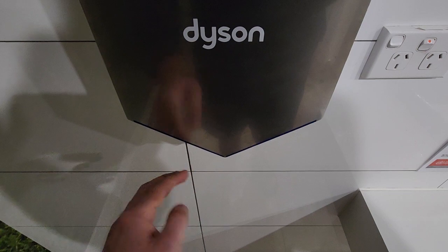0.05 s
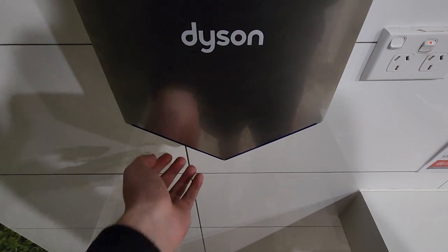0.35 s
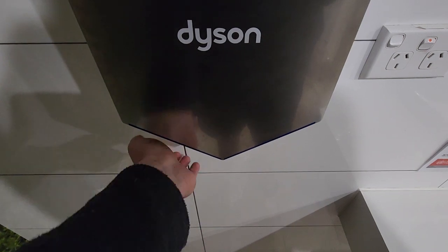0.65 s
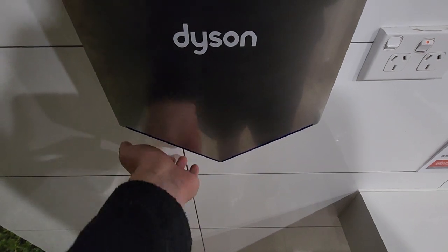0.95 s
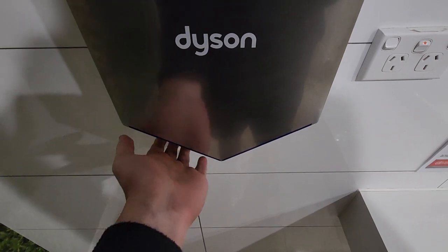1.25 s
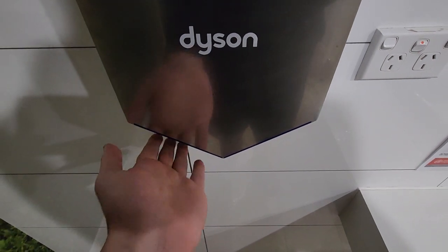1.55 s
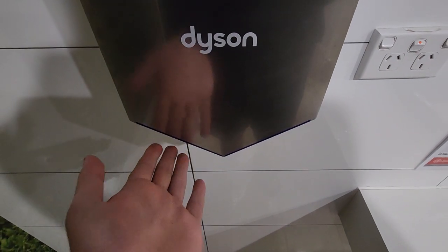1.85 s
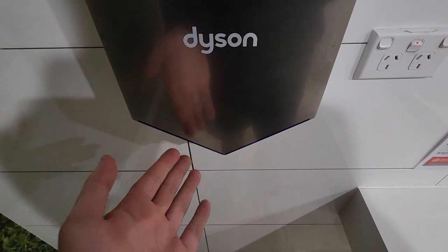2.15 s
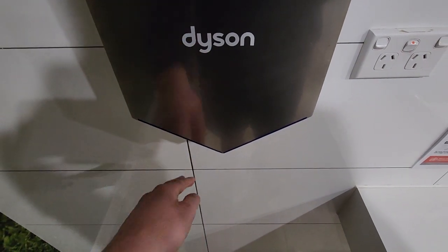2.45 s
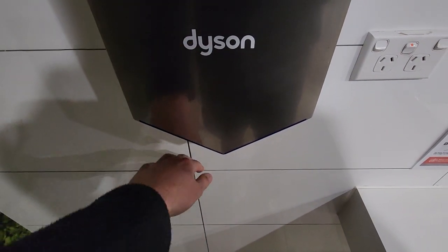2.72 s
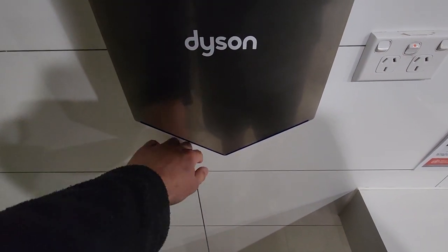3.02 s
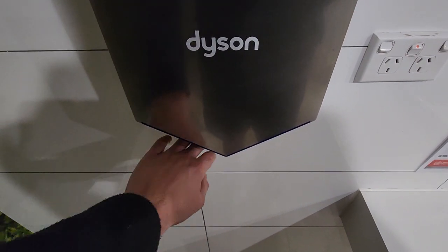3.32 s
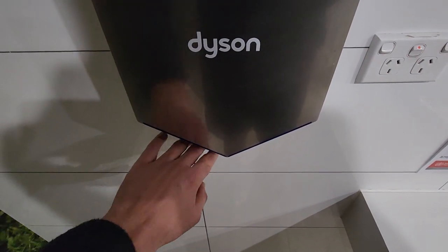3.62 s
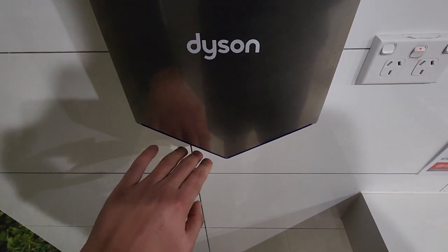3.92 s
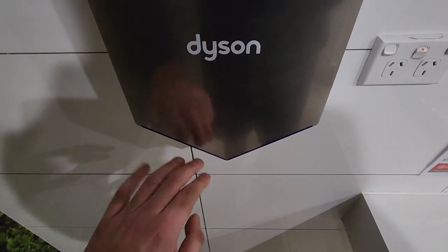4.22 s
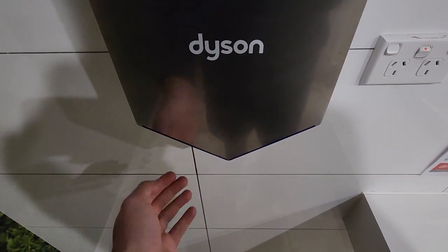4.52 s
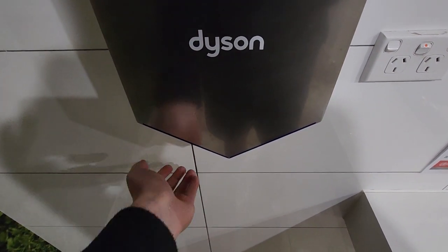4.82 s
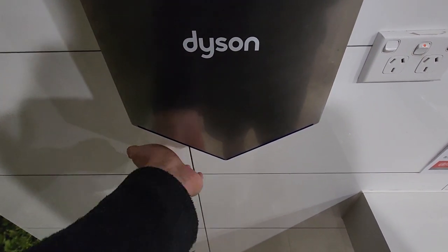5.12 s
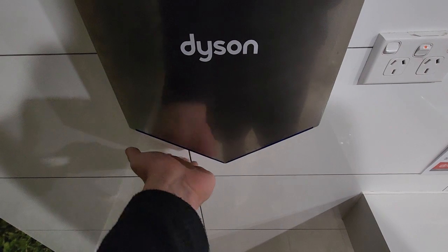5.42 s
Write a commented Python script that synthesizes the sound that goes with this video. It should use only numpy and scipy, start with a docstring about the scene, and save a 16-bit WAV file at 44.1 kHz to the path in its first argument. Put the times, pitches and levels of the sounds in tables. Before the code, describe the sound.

A hand dryer runs without a break in a small tiled washroom, close to the microphone. Thin air jets hiss over a rumbling casing, a low drone, an electrical hum and a thin motor whine. A hand moves through the air about four times; each pass starts hollow in the cupped palm, roars on the flat hand, then rasps over the fingers. The dryer is still blowing at the end.

```python
"""A hand dryer on the wall of a small tiled washroom blows for about 5.6 seconds, close to a phone.
From the start, thin air jets hiss over a rumbling casing, a low drone, a mains hum and a motor whine.
A hand is just finishing a stroke through the jets; new strokes begin at 0.1, 1.1, 2.5 and 4.5 s.
In each, the air rings hollow in the cupped palm, roars on the flat hand, then rasps over the fingers.
The roar is strongest near 1.7 and 3.8 s, and the dryer is still running at the end."""
import sys
import numpy as np
from scipy.fft import rfft, irfft
from scipy.io import wavfile
from scipy.ndimage import uniform_filter1d

SR = 44100
rng = np.random.default_rng(int(sys.argv[2]) if len(sys.argv) > 2 else 0)


def dump_mix(stems):
    """Bounce the given channels to the path in sys.argv[1] as a 16-bit WAV at rate SR."""
    frames = np.atleast_2d(stems).T  # one column per channel
    limited = np.clip(frames, -1, 1)  # hard clip at full scale
    pcm = np.round(limited * 32767).astype(np.int16)
    wavfile.write(sys.argv[1], SR, pcm)


N = 245637
T = np.arange(N) / SR  # the time of each sample
HZ = np.maximum(np.arange(N // 2 + 1) * SR / N, 1)  # the pitch of each slice of the spectrum

# colour (strength at each pitch) of the free air jets: pitch_hz, level_db_per_hz
JET_COLOUR = [(200, -75), (450, -69), (1000, -68), (2000, -69.5), (2800, -68.5), (3800, -65.5),
              (4600, -64.5), (6000, -64.5), (7700, -62.5), (11600, -56.5), (15500, -54)]
# air rumbling in the casing: pitch_hz, level_db_per_hz
RUMBLE_COLOUR = [(15, -67), (42, -60.5), (58, -61), (90, -51), (125, -52), (215, -61), (310, -54),
                 (360, -60), (420, -73), (700, -102)]
# narrow resonances on top of that rumble: pitch_hz, width_hz, peak_db_per_hz
CASING_RINGS = [(176.4, 11, -45.5), (203.4, 8.5, -47.5), (236.6, 13, -52), (320.4, 3.6, -53.5),
                (357, 6.9, -60.5), (531.7, 6.2, -58.5)]
# low resonances of casing and room that make the drone: pitch_hz, width_hz, relative_db
DRONE_RINGS = [(140.5, 5.5, -1.5), (156, 4.5, 0), (173.5, 4, -3.5)]
# the drone swells now and then: centre_s, length_s, rise_db
DRONE_SWELLS = [(0.55, 0.29, 4.5), (1.85, 0.45, 2), (2.8, 0.55, 3), (4.43, 0.23, 6)]
# tones in the mains hum: multiple_of_hum_pitch, level_db
HUM_TONES = [(1, -13), (2, -32)]
# the motor shaft settles to its running speed: time_s, pitch_hz
SHAFT_SPEED = [(0, 1488), (.55, 1489), (.9, 1479), (1.3, 1477), (2.4, 1481), (3.2, 1478.5), (5, 1480)]
# the whine at the phone's two microphones, before its boost: time_s, left_db, right_db
WHINE_LEVEL = [(0, -50, -40), (1.3, -32, -37), (1.95, -36.5, -34.5), (2.45, -36, -45), (2.8, -34, -36.5),
               (4.1, -36, -39), (4.8, -34.5, -35.5), (5.5, -38, -35.5)]
# how far the whine's wave is ahead at the left microphone: time_s, lead_radians
WHINE_LEAD = [(.95, 4.4), (1.25, 3.45), (1.85, 3.25), (2.7, 4.6), (2.95, 3.4), (3.25, 3.3), (3.55, 3.85),
              (4.45, 3.7), (5, 4.4)]
# strokes of the hand; the palm fades from its level, the rasp builds up to its own:
# start_s, length_s, palm_db, rasp_db, rasp_build_db
HAND_STROKES = [(-0.5, 0.54, -25.5, -27, 5), (0.1, 0.94, -33.5, -25, 14.5), (1.105, 0.98, -40, -22, 6),
                (2.51, 1.72, -34, -22.5, 15.5), (4.5, 0.99, -33.5, -25, 14)]
# the hand lies flat under the jets and roars: centre_s, length_s, level_db
FLAT_HAND = [(0.5, 0.65, -36.5), (1.69, 0.55, -29.5), (3.783, 0.57, -30), (5.24, 0.25, -35)]
# air roaring on the flat hand: pitch_hz, relative_db
ROAR_COLOUR = [(350, -39), (600, -7), (780, -3), (1020, -2.5), (1400, -7), (2200, -8), (5000, -31)]
# air rasping over the fingers: pitch_hz, relative_db
RASP_COLOUR = [(700, -27), (1400, -11.5), (2100, -2), (3300, 1), (4600, -4.5), (8000, -2), (13000, -10.5)]
# how alike the noise is at the two microphones: pitch_hz, likeness_0_to_1
MIC_LIKENESS = [(25, 1), (90, 0.97), (170, .998), (340, 1), (500, 0.69), (1400, 0.58), (2500, 0.05),
                (6000, 0.01)]
# how the two microphone openings colour the sound: pitch_hz, left_db, right_db
MIC_COLOUR = [(95, -2.5, -3), (1000, 3.5, 2), (1980, 4.5, 5), (2690, -1.5, 1), (3550, 0, 4), (4720, -1, 13),
              (4840, 7.5, 3.5), (5130, 0, 9.5), (6980, 3, -2), (7580, 5, -2.5), (8310, 1.5, -25),
              (8760, -5.5, -13), (9650, -14, -20), (10780, -8.5, -21), (11430, -5.5, -10.5),
              (12830, 1.5, -10), (14000, 2, -15), (15500, -2, -6.5)]

HUM_HZ, DRONE_DB = 99.93, -23.5
ENTER_S, LEAVE_S = 0.12, 0.2  # the hand slides into the jets and out again
FINGERS_AT = 0.8  # share of a stroke after which the jets lie fully on the fingers
PALM_FADE_DB = 8  # the hollow ring fades as the palm opens over a stroke
TILTED_ROAR_DB = -39.5  # roar while the hand is tilted


def undb(db):
    """Turn decibels into a gain, a number to multiply a sound by."""
    return 10 ** (np.asarray(db) / 20)


def over_time(table):
    """Join a table's points in time, giving each column a value at every sample."""
    times, *columns = np.transpose(table)
    return [np.interp(T, times, column) for column in columns]


def over_pitch(table):
    """Join a table's points in pitch, giving each column a value at every pitch."""
    hz, *columns = np.transpose(table)
    return np.array([np.interp(np.log(HZ), np.log(hz), column) for column in columns])


def wobble(rate_hz):
    """A smooth random wander, about 1 in size, with rate_hz new values a second."""
    hold = int(SR / rate_hz)
    steps = np.repeat(rng.standard_normal(N // hold + 1), hold)
    smooth = uniform_filter1d(uniform_filter1d(steps, hold), hold)[:N]
    return smooth / np.std(smooth)


def bump(centre_s, length_s):
    """A smooth rise to 1 and fall, above half height for length_s."""
    return np.cos(np.pi / 2 * np.clip((T - centre_s) / length_s, -1, 1)) ** 2


def resonance(hz, width_hz):
    """A colour that favours one pitch: 1 at its centre, falling steeply on both sides."""
    return 1 / (1 + ((HZ ** 2 - hz ** 2) / (HZ * width_hz * np.pi / 2)) ** 2)


def normalise(colour):
    """Scale a colour so that its noise has an average power of 1."""
    return colour / np.sqrt(np.mean(colour ** 2) * SR / 2)


def air_noise(colour, right_lag_s=0.00028):
    """Churning air at both microphones: the bass arrives as one wave, the treble from every wall."""
    shared, left, right = rfft(rng.standard_normal((3, N)))
    alike = np.clip(over_pitch(MIC_LIKENESS), 0, 1)
    lag = np.exp(-2j * np.pi * HZ * np.array([[0], [right_lag_s]]))
    pair = np.sqrt(alike) * shared * lag + np.sqrt(1 - alike) * np.array([left, right])
    return irfft(pair * colour, N) * np.sqrt(SR / 2)


def jet_hiss():
    """Air rushes out of the slots and hisses evenly, with a slight flutter."""
    flutter_db = 0.45 * wobble(rate_hz=9)
    return air_noise(undb(over_pitch(JET_COLOUR))) * undb(flutter_db)


def casing_rumble():
    """The churning air rumbles in the casing and makes it ring at a few pitches."""
    power = undb(over_pitch(RUMBLE_COLOUR)) ** 2
    for hz, width_hz, db in CASING_RINGS:
        power = power + (undb(db) * resonance(hz, width_hz)) ** 2
    return air_noise(np.sqrt(power))


def low_drone(steady_s):
    """Three close resonances throb together; their waves are long, so both microphones hear the same."""
    colour = sum(undb(db) * resonance(hz, width_hz) for hz, width_hz, db in DRONE_RINGS)
    ring = irfft(rfft(rng.standard_normal(N)) * colour, N)
    loudness = np.sqrt(uniform_filter1d(ring ** 2, int(steady_s * SR)))
    steady_ring = ring / loudness
    swell_db = sum(rise_db * bump(centre_s, length_s) for centre_s, length_s, rise_db in DRONE_SWELLS)
    return steady_ring * undb(DRONE_DB + swell_db)


def mains_hum(left_lag_s=0.00015):
    """The motor's power pulses at twice the mains frequency and shakes the casing."""
    phase = 2 * np.pi * HUM_HZ * (T - np.array([[left_lag_s], [0]]))
    return sum(np.sqrt(2) * undb(db) * np.sin(round(multiple) * phase + rng.uniform(0, 2 * np.pi))
               for multiple, db in HUM_TONES)


def motor_whine(boost_db, octave_db):
    """The shaft sings as its speed wobbles; the hand shifts its loud and quiet spots in the room."""
    lead = over_time(WHINE_LEAD)[0]
    hz = over_time(SHAFT_SPEED)[0] + 1.8 * wobble(rate_hz=30)
    flicker_db = 0.6 * wobble(rate_hz=25)
    phase = 2 * np.pi * np.cumsum(hz) / SR + np.array([lead, -lead]) / 2
    level = undb(boost_db + np.array(over_time(WHINE_LEVEL)) + flicker_db)
    return np.sqrt(2) * level * (np.sin(phase) + undb(octave_db) * np.sin(2 * phase))


def hand_gains():
    """How strong palm, roar and rasp are as the hand enters cupped, turns flat and shows its fingers."""
    palm = contact = rasp = 0
    for start_s, length_s, palm_db, rasp_db, build_db in HAND_STROKES:
        progress = np.clip((T - start_s) / length_s, 0, 1)
        fade_in = np.clip((T - start_s) / ENTER_S, 0, 1)
        fade_out = np.clip(1 - (T - start_s - length_s) / LEAVE_S, 0, 1)
        in_jets = fade_in * fade_out
        on_fingers = np.minimum(progress / FINGERS_AT, 1)
        palm = palm + in_jets * undb(palm_db - PALM_FADE_DB * progress ** 2)
        rasp = rasp + in_jets * undb(rasp_db - build_db * (1 - on_fingers))
        contact = np.maximum(contact, in_jets)
    flat_power = sum(undb(db) ** 2 * bump(centre_s, length_s) for centre_s, length_s, db in FLAT_HAND)
    roar = contact * np.sqrt(undb(TILTED_ROAR_DB) ** 2 + flat_power)
    return palm, roar, rasp


def air_on_hand():
    """The jets break on the skin; each way of holding the hand has its own colour, and all flutter."""
    palm_gain, roar_gain, rasp_gain = hand_gains()
    hollow = resonance(hz=570, width_hz=300) + undb(4.0) * resonance(hz=278, width_hz=61)
    spray = resonance(hz=5800, width_hz=4200)  # air spilling over the rim of the palm
    palm = air_noise(normalise(hollow) + undb(-4.5) * normalise(spray)) * palm_gain
    roar = air_noise(normalise(undb(over_pitch(ROAR_COLOUR)))) * roar_gain
    rasp = air_noise(normalise(undb(over_pitch(RASP_COLOUR)))) * rasp_gain
    flutter_db = 0.5 * wobble(rate_hz=35)
    return (palm + roar + rasp) * undb(flutter_db)


def tile_echoes(sound, echo_db, decay_s):
    """Quick echoes off the hard wall and floor colour the sound, differently at each microphone."""
    echoes = rng.standard_normal((2, N)) * np.exp(-T / decay_s)
    echoes *= undb(echo_db) / np.sqrt(np.sum(echoes ** 2, axis=1, keepdims=True))
    with_echoes = irfft(rfft(sound) * (1 + rfft(echoes)), N)
    return with_echoes / np.sqrt(1 + undb(echo_db) ** 2)  # keep the overall level


def scene():
    """Rushing air among the tiles, over the sounds of the machine."""
    air = tile_echoes(jet_hiss() + air_on_hand(), echo_db=-11.0, decay_s=0.013)
    low_sounds = casing_rumble() + low_drone(steady_s=0.13) + mains_hum()
    return air + low_sounds + motor_whine(boost_db=1.0, octave_db=-15)


def record(dry):
    """Each microphone opening colours the sound in its own way; the phone cuts the highest treble."""
    top_hz, fade_hz = 15880, 150
    treble_cut = np.clip((top_hz - HZ) / fade_hz, 0, 1)
    return irfft(rfft(dry) * undb(over_pitch(MIC_COLOUR)) * treble_cut, N)


dry = scene()
out = record(dry)
dump_mix(out)
```